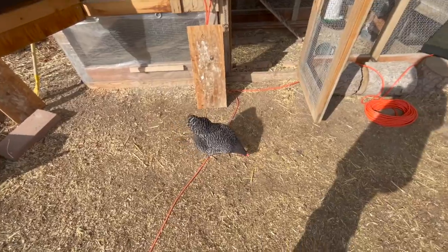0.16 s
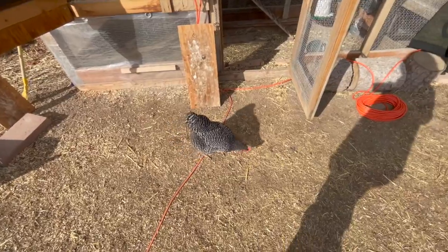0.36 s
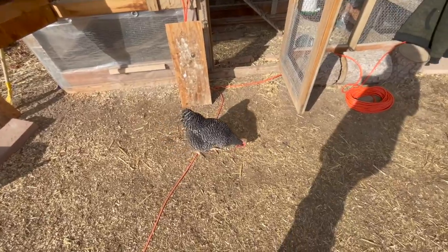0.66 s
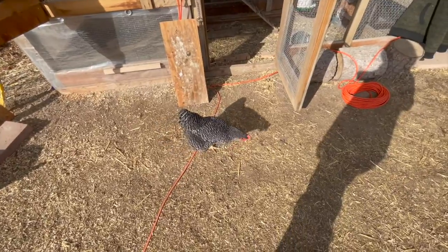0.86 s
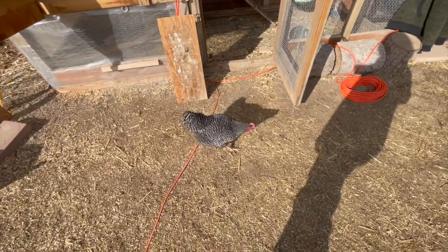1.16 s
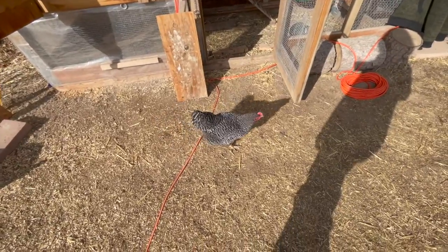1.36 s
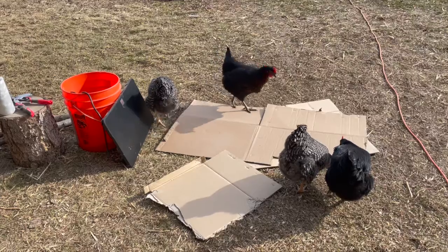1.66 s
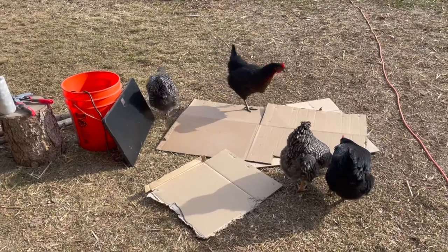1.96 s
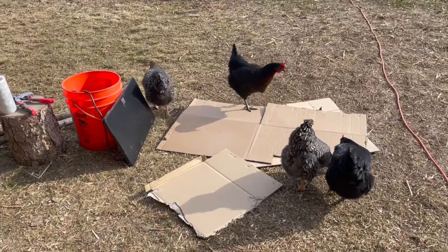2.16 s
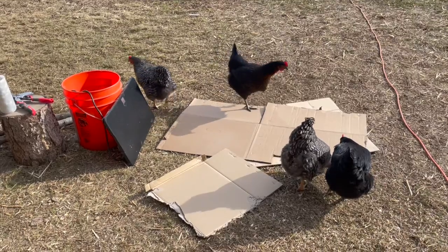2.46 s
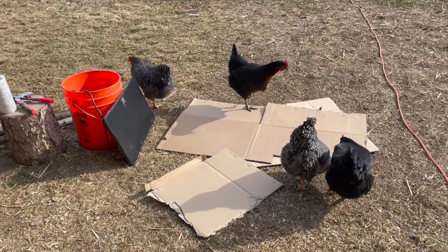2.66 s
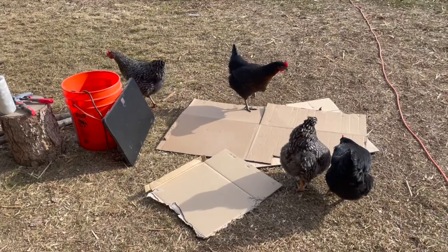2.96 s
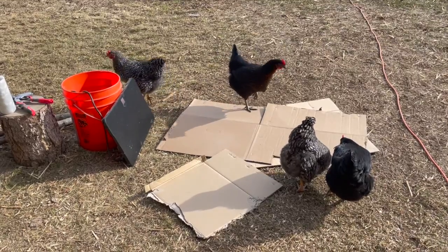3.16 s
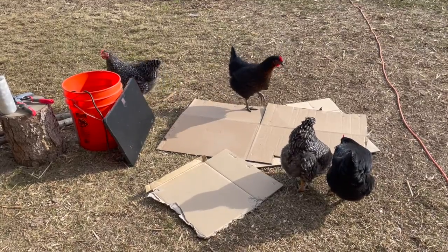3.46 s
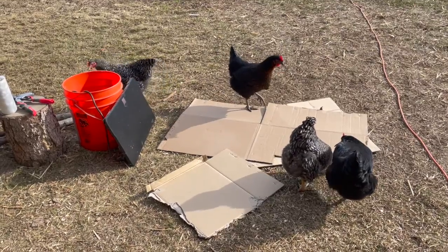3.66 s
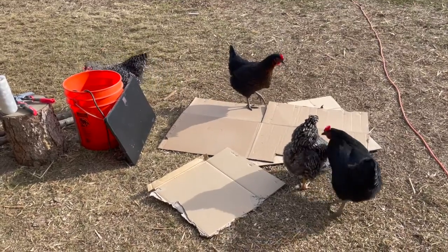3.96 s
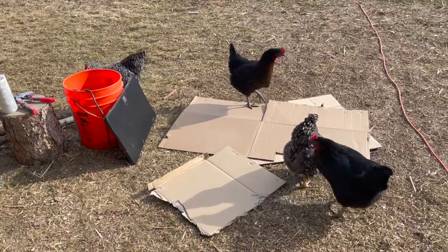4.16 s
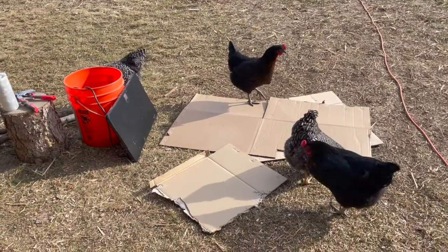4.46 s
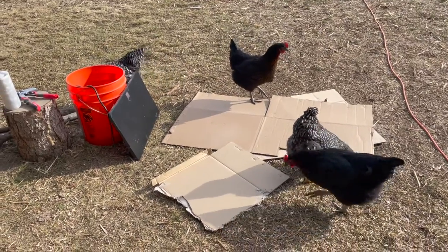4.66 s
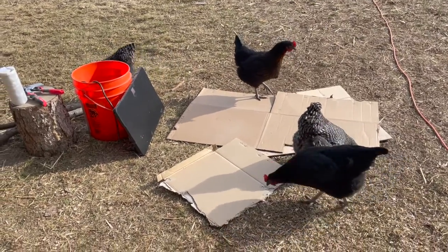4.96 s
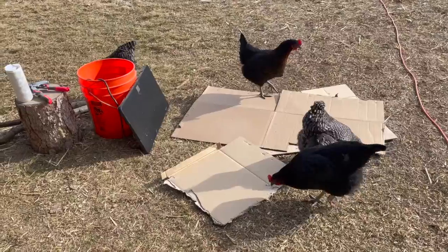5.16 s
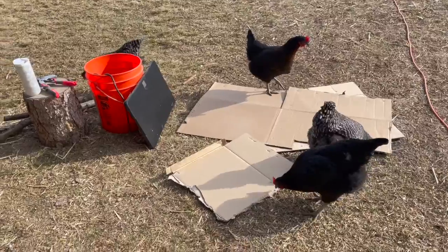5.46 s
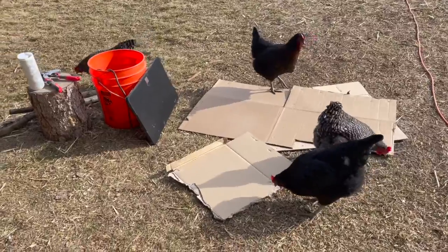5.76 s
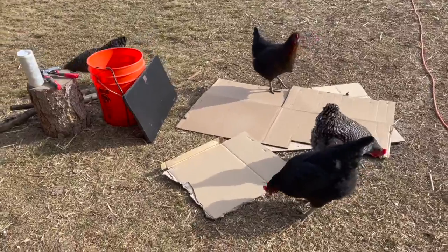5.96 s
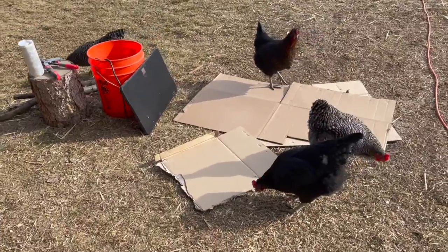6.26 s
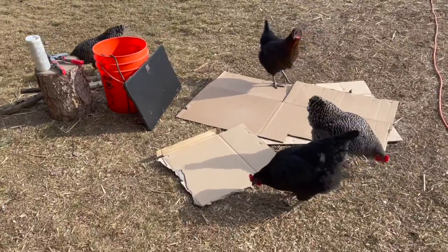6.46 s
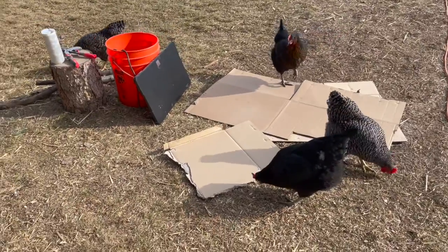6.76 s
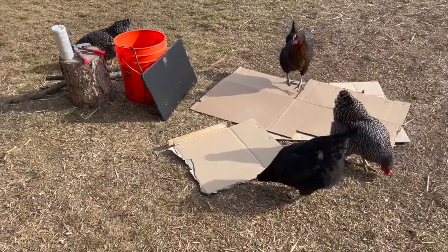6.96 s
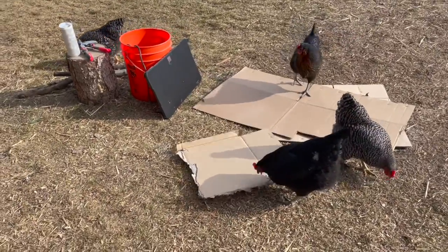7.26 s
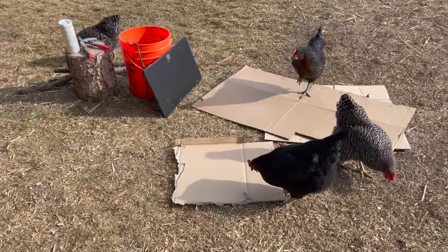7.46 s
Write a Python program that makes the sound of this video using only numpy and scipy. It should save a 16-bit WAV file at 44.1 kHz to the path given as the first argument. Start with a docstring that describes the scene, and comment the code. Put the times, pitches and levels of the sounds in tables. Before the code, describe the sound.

Small songbirds chirp and slur continually, slightly blurred by yard echoes, after an opening of whistles and a swelling raspy buzz. Low buffeting wind and a soft hollow breeze come and go underneath. Close to the microphone, hens tap and crackle over cardboard and dry stalks, first in brief isolated contacts, later in busy scraping, joined by a run of low, short, rounded clucks.

```python
"""A few clear bird whistles open over soft outdoor noise; a rising buzz, chips and a long warble follow.
Hens peck and scrape cardboard over dry grass, then one gives a run of soft clucks near the end.
Birds are gliding or swept sines with yard echoes; clucks are harmonics weighted by a throat resonance.
Pecks and knocks ring resonators; scrapes are dense random snaps; breeze and rumble are banded noise.
Table levels are relative: each source applies its own gain."""
import sys
import numpy as np
from scipy import signal
from scipy.io import wavfile

SR = 44100
rng = np.random.default_rng(int(sys.argv[2]) if len(sys.argv) > 2 else 0)


def to_wav(sig):
    """Store sig (one row per channel, or 1-D mono) as 16-bit WAV at the path in sys.argv[1].

    Samples outside -1..1 are clipped; the rate is SR.
    """
    pcm = np.clip(np.atleast_2d(sig), -1, 1) * 32767
    pcm = np.round(pcm).astype(np.int16)
    wavfile.write(sys.argv[1], SR, pcm.T)  # frames by channels


N = 336042
TIME = np.arange(N) / SR


def from_db(db):
    """Amplitude ratio of a level in dB."""
    return 10 ** (np.asarray(db) / 20)


def rms(x):
    """Root mean square, kept above zero."""
    return np.sqrt(np.mean(x ** 2) + 1e-20)


def in_time(rows):
    """Each column of a table as a curve over the whole scene."""
    s, *columns = np.transpose(rows)
    return [np.interp(TIME, s, column) for column in columns]


def during(rows):
    """True between the first and last row of a table."""
    return (TIME >= rows[0][0]) & (TIME <= rows[-1][0])


def at_hz(points, hz):
    """Reads a spectrum on a log-frequency axis."""
    points_hz, points_db = np.transpose(points)
    return np.interp(np.log(hz), np.log(points_hz), points_db)


def add(out, s, sound):
    """Mixes a short sound in at time s."""
    start = max(round(s * SR), 0)
    out[..., start:start + sound.shape[-1]] += sound[..., :max(N - start, 0)]


def drift(rate_hz):
    """Smooth random curve of rms 1, changing about rate_hz times a second."""
    step = 10  # samples per point of the slow curve
    r = np.exp(-2 * np.pi * step * rate_hz / SR)
    noise = rng.standard_normal(N // step + 4002)
    slow = signal.lfilter([1], [1, -2 * r, r * r], noise)[4000:]  # drop the filter's onset
    return np.interp(np.arange(N) / step, np.arange(len(slow)), slow / rms(slow))


def resonance(x, hz, width_hz):
    """Two-pole resonance with gain 1 on top."""
    r = np.exp(-np.pi * width_hz / SR)
    zeros = np.array([1, 0, -1]) * (1 - r * r) / 2
    poles = [1, -2 * r * np.cos(2 * np.pi * hz / SR), r * r]
    return signal.lfilter(zeros, poles, x)


def bandpass(x, low_hz, high_hz):
    """Butterworth band of x."""
    return signal.sosfilt(signal.butter(2, [low_hz, high_hz], "band", fs=SR, output="sos"), x)


def left_right(mid_side):
    """Scales mid to rms 1 and decodes to left and right."""
    mid, side = mid_side / rms(mid_side[0])
    return np.array([mid + side, mid - side])


def panned(x, pan_db):
    """Tips a stereo sound to the left by pan_db."""
    return np.array([x[0] * from_db(pan_db / 2), x[1] * from_db(-pan_db / 2)])


# side against mid: f/Hz, level/dB
SIDE_WIDTH = [(60, -17), (120, -17), (200, -10), (380, -8.5), (700, -0.5), (1300, 4.5), (2400, -5),
              (4400, -4), (7000, 1.5), (8800, 11), (11800, -2), (13500, -23)]


def coloured(spectrum, count, grain=1, patchy_db=0, shading=None):
    """Stereo noise in flickering bands; grain gates it, shading(hz) adds dB over time; mid rms 1."""
    source = rng.standard_normal((2, 2, N)) * grain
    edges_hz = np.geomspace(spectrum[0][0], min(spectrum[-1][0], SR / 2 - 1000), count + 1)
    out = 0
    for k, (low_hz, high_hz) in enumerate(zip(edges_hz, edges_hz[1:])):
        hz = np.sqrt(low_hz * high_hz)
        band = bandpass(source[k % 2], low_hz, high_hz)  # neighbouring bands use separate noise
        band[1] *= from_db(at_hz(SIDE_WIDTH, hz))
        level_db = at_hz(spectrum, hz) + patchy_db * drift(11.8)
        if shading:
            level_db = level_db + shading(hz)
        out = out + band * from_db(level_db)
    return left_right(out)


def yard(x, t60, first_s=.006, count=90):
    """Scattered echoes off ground, coop and fence, different for each ear; as strong as x."""
    out = np.zeros((2, N))
    for ear in out:
        delays_s = first_s + (np.arange(count) + rng.random(count)) / count * t60 * .7
        gains = from_db(-60 * delays_s / t60) * rng.choice([-1, 1], count)
        for delay_s, gain in zip(delays_s, gains / np.linalg.norm(gains)):
            add(ear, delay_s, gain * x)
    return out


def note_envelope(u, exponent):
    """Rounded envelope over u = 0..1; a small exponent makes it fuller."""
    return np.maximum(np.sin(np.pi * u), 0) ** exponent


def swells(rows, shape):
    """Power-summed pushes (s, dB, rise s, fall s); rise and fall each span 20 dB."""
    power = np.zeros(N)
    for s, level_db, rise_s, fall_s in rows:
        t = np.arange(-min(4 * rise_s, s), 4 * fall_s, 1 / SR)
        away = np.where(t < 0, -t / rise_s, t / fall_s)
        add(power, s + t[0], from_db(level_db - 20 * away ** shape) ** 2)
    return np.sqrt(power)


SWELL_SHAPE = 1.62  # 1: pointed peak, 2: round


# distant outdoor noise: t/s, level/dB
AIR_LEVEL = [(0, -46.5), (.6, -54), (.9, -49.5), (1.45, -43), (1.6, -57.5), (2.6, -56), (3.9, -59.5),
             (5.7, -49), (6.2, -53), (6.6, -47.5), (7.0, -50.5), (7.62, -47.5)]
# its spectrum: f/Hz, density/(dB per Hz)
AIR_SPECTRUM = [(35, -13.5), (70, 10), (150, 8), (300, 3), (600, 2), (950, 1.5), (1300, -7), (2000, -15),
                (2800, -18.5), (4300, -42), (5500, -75), (7000, -96.5)]
# its lean: t/s, left over right/dB
AIR_PAN = [(0, 0.5), (.9, 3.5), (1.45, 1.5), (1.55, 3.5), (7.62, 0.4)]


def distant_air():
    """Distant outdoor noise: banded noise whose level and left-right lean follow tables."""
    noise = coloured(AIR_SPECTRUM, count=16, patchy_db=2.0)
    return from_db(in_time(AIR_LEVEL)[0]) * panned(noise, in_time(AIR_PAN)[0])


# steady wind rumble on the microphone: t/s, level/dB
RUMBLE_LEVEL = [(1.5, -47), (2.4, -40), (3.0, -52.5), (3.45, -49), (4.05, -54.5), (4.45, -42.5),
                (4.8, -48.5), (5.3, -53), (6.3, -51.5), (7.62, -53)]
# eddies buffeting the microphone: peak t/s, level/dB, rise/s, fall/s
EDDIES = [(1.6, -29.5, 0.043, .03), (1.65, -32, 0.063, 0.031), (1.77, -34, 0.082, 0.14),
          (1.94, -41.5, 0.07, 0.16), (2.115, -33.5, 0.049, 0.036), (2.27, -33.5, 0.039, 0.18),
          (2.385, -36.5, 0.022, .05), (2.45, -36.5, 0.041, 0.056), (2.58, -45, .03, 0.028),
          (2.69, -40.5, 0.026, 0.28), (2.89, -35.5, 0.034, .09), (2.975, -34, 0.062, 0.049),
          (3.11, -37, .03, 0.14), (3.215, -41, 0.054, 0.12), (3.36, -45.5, .058, 0.068),
          (3.59, -36, 0.028, 0.043), (3.675, -39.5, .03, 0.097), (3.89, -37, 0.02, 0.037),
          (4.335, -42, 0.038, .03), (4.47, -44, 0.072, 0.081)]
# rumble spectrum: f/Hz, density/(dB per Hz)
RUMBLE_SPECTRUM = [(40, -19.5), (52, -19.5), (70, 4.5), (105, -4), (128, -4), (158, 0), (220, -12.5),
                   (320, -9)]
LUMPS_HZ, LUMPS_DB = 6.8, 3


def wind_rumble(eddy_shape=0.91):
    """Wind pressure on the microphone: lumpy low noise with single eddies, summed in power."""
    steady = from_db(in_time(RUMBLE_LEVEL)[0] + LUMPS_DB * drift(LUMPS_HZ))
    envelope = np.hypot(steady, swells(EDDIES, eddy_shape))
    return envelope * coloured(RUMBLE_SPECTRUM, count=10, patchy_db=1.5) * during(RUMBLE_LEVEL)


# breeze rushing past in two gusts: t/s, level/dB
BREEZE_LEVEL = [(1.5, -56), (1.53, -39), (1.65, -43.5), (2.96, -48.5), (3.4, -59.5), (3.9, -56.5),
                (4.45, -43), (4.8, -42), (5.01, -40), (5.47, -53.5), (5.7, -48.5), (6.15, -56.5),
                (6.8, -69)]
# its spectrum: f/Hz, density/(dB per Hz)
BREEZE_SPECTRUM = [(130, -5), (170, -2.5), (220, -4.5), (300, 0), (390, 1.5), (540, -1), (760, -2.5),
                   (950, -12.5), (1300, -22), (2000, -31)]
# its spectral tilt: t/s, slope/(dB per octave)
BREEZE_TILT = [(1.5, 1.5), (2.2, 5), (2.8, 2), (3.9, 5), (4.3, -2.5), (5.0, -2.5), (5.6, -4.5), (6.5, -0.5)]
# its wandering hollow centre: t/s, f/Hz
BREEZE_CENTRE = [(1.5, 786), (2.2, 687), (3.2, 708), (4.1, 697), (4.5, 564), (4.8, 514), (5.05, 535),
                 (5.3, 450), (5.7, 642)]


def breeze(gain_db=-1, hollow_db=4, hollow_octaves=.3):
    """Soft rush: noise with a moving tilt and a broad wandering peak that sounds hollow."""
    tilt_db, centre_hz = in_time(BREEZE_TILT)[0], in_time(BREEZE_CENTRE)[0]

    def shading(hz):
        """Tilt about 630 Hz plus the hollow peak, in dB over time."""
        octaves_off = np.log2(hz / centre_hz)
        return tilt_db * np.log2(hz / 630) + hollow_db * np.exp(-(octaves_off / hollow_octaves) ** 2)

    noise = coloured(BREEZE_SPECTRUM, count=16, patchy_db=3.0, shading=shading)
    return from_db(gain_db + in_time(BREEZE_LEVEL)[0]) * noise * during(BREEZE_LEVEL)


def whistles(notes):
    """Each note is one quavering, fluttering sine that glides through three pitches."""
    out, waver = np.zeros(N), drift(280)
    for s, length_s, jitter, *pitches_hz, level_db in notes:
        u = np.linspace(0, 1, round(length_s * SR))
        now = round(s * SR) + np.arange(len(u))
        glide_hz = np.polyval(np.polyfit([0, .5, 1], pitches_hz, 2), u)
        pitch_hz = glide_hz * (1 + jitter * waver.take(now, mode="clip"))
        tone = np.sin(2 * np.pi * np.cumsum(pitch_hz) / SR)
        add(out, s, from_db(level_db) * 2 * note_envelope(u, exponent=0.5) * tone)
    flutter_db = 3 * drift(70) - 1
    return out * from_db(flutter_db)


# small birds twittering further off: t/s, level/dB
TWITTER_LEVEL = [(0, -48), (.3, -78), (1.55, -64.5), (2.1, -70.5), (2.65, -63.5), (3.0, -76), (3.8, -80.5),
                 (4.4, -70.5), (5.0, -62), (5.4, -63.5), (5.7, -72), (6.1, -78), (6.6, -60.5), (6.9, -77),
                 (7.62, -82)]


def twitter(gain_db=-1, low_hz=3300, high_hz=4700, jitter=.03, count=700):
    """Distant birds: one short random note per time slot, heard only through echoes."""
    notes = []
    for k, (when, length, height, *bends) in enumerate(rng.random((count, 6))):
        s = (k + when) / count * N / SR
        length_s = .012 + .022 * length
        base_hz = low_hz + (high_hz - low_hz) * height
        pitches_hz = base_hz * (.88 + .24 * np.array(bends))
        notes.append((s, length_s, jitter, *pitches_hz, 0))
    chorus = yard(whistles(notes), t60=.3, count=50)
    return from_db(gain_db + in_time(TWITTER_LEVEL)[0]) * chorus / rms(chorus)


# rising buzz, sweep limits before wobble: t/s, low f/Hz, high f/Hz, level/dB
BUZZ = [(.68, 5130, 5180, -76), (.78, 5040, 5600, -56), (.86, 4990, 6560, -52.5), (1.0, 5100, 6900, -55),
        (1.1, 5060, 7090, -50.5), (1.26, 4870, 7190, -51), (1.32, 4400, 7590, -46.5),
        (1.39, 4260, 7220, -44), (1.50, 4090, 6530, -48.5)]
# pitches that ring out of it: f/Hz, width/Hz, gain/dB
BUZZ_RINGS = [(4180, 260, 4), (4640, 130, 5.5), (4990, 120, 7.5), (5990, 100, 4.5), (6920, 110, -5),
              (8200, 200, 12)]
BUZZ_PAN_DB = 8  # to the left


def buzzer(sweep_hz=185, wobble_hz=240, gain_db=-1.0, direct_db=-9, ring_drift_db=1.5):
    """A whistle swept up and down fast and unevenly, with resonances and close echoes."""
    low_hz, high_hz, level_db = in_time(BUZZ)
    cycles = np.cumsum(sweep_hz * (1 + .3 * drift(150))) / SR
    triangle = np.abs(2 * (cycles % 1) - 1)
    pitch_hz = low_hz + (high_hz - low_hz) * triangle + wobble_hz * drift(49.0)
    tone = np.sin(2 * np.pi * np.cumsum(pitch_hz) / SR)
    rasp_db = 3.2 * drift(45)
    whistle = from_db(level_db + gain_db + rasp_db) * during(BUZZ) * tone
    call = whistle.copy()
    for hz, width_hz, ring_db in BUZZ_RINGS:
        call += from_db(ring_db + ring_drift_db * drift(3.4)) * resonance(whistle, hz, width_hz)
    echoes = yard(call, t60=0.17, first_s=0.0014, count=40)
    return panned((from_db(direct_db) * call + echoes) * during(BUZZ), BUZZ_PAN_DB)


CHIPS_START_S, CHIP_GAP_S, CHIP_S = .881, .105, 0.0245
CHIP_FROM_HZ, CHIP_TO_HZ = 4250, 3800  # before jitter
FIRST_CHIP_DB, CHIP_GROWTH_DB = -53.5, 2


def chips(count=4):
    """An even run of short falling notes, each a little louder."""
    middle_hz = (CHIP_FROM_HZ + CHIP_TO_HZ) / 2
    notes = []
    for k in range(count):
        s, level_db = CHIPS_START_S + k * CHIP_GAP_S, FIRST_CHIP_DB + k * CHIP_GROWTH_DB
        notes.append((s, CHIP_S, CHIP_FROM_HZ, middle_hz, CHIP_TO_HZ, level_db))
    return notes


# songbird notes: t/s, length/s, start f/Hz, middle f/Hz, end f/Hz, level/dB
SONG = [(0, 0.037, 3920, 4000, 4500, -56.5), (0.062, 0.03, 3190, 3700, 4250, -48),
        (0.105, 0.035, 2740, 2900, 2970, -46), (0.12, 0.034, 2740, 2400, 2210, -53.5),
        (0.244, 0.056, 4870, 5230, 5070, -60.5), (1.946, .06, 6830, 6340, 5800, -75),
        (1.957, 0.089, 3380, 3320, 3360, -68), (2.06, 0.062, 6700, 6250, 5430, -71.5),
        (2.162, 0.072, 6620, 6450, 6000, -85), (1.978, 0.04, 5400, 5200, 4640, -67),
        (2.041, 0.094, 5390, 5310, 5170, -58.5), (2.094, 0.048, 5570, 4890, 3980, -56),
        (2.103, 0.058, 4010, 3960, 3870, -63), (2.154, 0.042, 5100, 5060, 5230, -67.5),
        (2.221, 0.044, 5300, 4700, 3620, -64), (2.37, 0.037, 4110, 4300, 4340, -64),
        (2.411, 0.033, 4850, 4840, 4800, -59), (2.421, 0.1, 4430, 3990, 3880, -65),
        (2.566, 0.032, 6100, 5780, 5600, -74), (2.572, .055, 3960, 3900, 3770, -58.5),
        (2.644, 0.069, 4600, 4800, 4900, -71), (2.647, 0.092, 3360, 3236, 3270, -61.5),
        (2.734, 0.03, 4010, 3850, 3800, -61), (2.766, 0.031, 3330, 3330, 3260, -62),
        (2.856, 0.03, 4300, 3770, 3900, -60), (2.905, 0.034, 5500, 5800, 5530, -66),
        (2.972, 0.034, 5000, 4970, 4830, -66.5), (3.151, 0.057, 5350, 4820, 5630, -69.5),
        (3.236, 0.062, 5150, 5200, 5200, -61), (3.29, 0.048, 5340, 4320, 3680, -61.5),
        (3.428, 0.038, 4920, 4220, 3520, -66), (3.912, 0.021, 4070, 4060, 3670, -68),
        (4.043, 0.029, 4050, 4380, 4380, -59), (4.06, 0.023, 3690, 3610, 3800, -58),
        (4.079, 0.032, 4850, 5140, 5150, -63.5), (4.212, 0.056, 5250, 4850, 3910, -55.5),
        (4.25, 0.045, 3770, 3800, 3720, -51), (4.326, 0.029, 4280, 4750, 5140, -61),
        (4.353, 0.014, 5260, 4590, 4130, -57.5), (4.443, 0.096, 4200, 3960, 4110, -56),
        (4.492, 0.059, 4060, 4396, 4405, -51), (4.507, 0.026, 4460, 4800, 4800, -62),
        (4.629, 0.033, 4100, 3620, 3200, -54), (4.717, 0.076, 3950, 3950, 3800, -53),
        (4.792, 0.043, 5030, 5120, 4980, -62), (4.813, 0.044, 3050, 2992, 2930, -47),
        (4.923, 0.06, 5320, 4690, 3400, -56), (5.037, 0.065, 3740, 3450, 2600, -55),
        (5.163, 0.065, 4470, 4020, 3540, -56.5), (5.19, 0.051, 3600, 3530, 3680, -53.5),
        (5.303, 0.074, 4700, 4490, 4260, -52), (5.386, 0.045, 3960, 3700, 4400, -58),
        (5.445, 0.028, 4700, 4200, 3860, -61), (5.483, 0.017, 3230, 3230, 3250, -49.5),
        (5.514, 0.13, 3230, 3290, 3530, -54.5), (5.707, .05, 5160, 4860, 4000, -61),
        (5.786, 0.05, 3760, 3315, 3140, -58), (5.802, 0.019, 3650, 3470, 3200, -60),
        (5.922, 0.068, 3440, 3520, 2810, -63), (6.017, .018, 4220, 4670, 4440, -56),
        (6.034, 0.011, 3920, 3740, 4230, -53), (6.177, 0.037, 3090, 3340, 3730, -65.5),
        (6.324, 0.039, 4760, 4970, 4940, -65), (6.393, 0.055, 4930, 4520, 3520, -55),
        (6.442, 0.017, 3750, 3680, 3740, -54), (6.477, 0.059, 5180, 4800, 3550, -51),
        (6.595, 0.026, 3300, 3300, 3300, -60), (6.718, 0.055, 3970, 3740, 2980, -64.5),
        (6.819, 0.025, 4460, 4560, 3420, -56.5), (7.281, 0.057, 4970, 4580, 3410, -48.5),
        (7.563, 0.013, 4100, 4490, 5000, -52), (7.576, 0.021, 4830, 3870, 4700, -53.5),
        (7.588, .016, 4660, 4380, 3860, -60)]


def warbler(direct_db=-5.5, near_echo_db=-2.5, far_echo_db=-11, steady_jitter=0.012, jitter_per_octave=0.042):
    """Gliding whistles that quaver more the wider they slur, blurred by close and longer echoes."""
    notes = []
    for s, length_s, start_hz, middle_hz, end_hz, level_db in SONG + chips():
        jitter = steady_jitter + jitter_per_octave * abs(np.log2(end_hz / start_hz))
        notes.append((s, length_s, jitter, start_hz, middle_hz, end_hz, level_db))
    song = whistles(notes)
    blur = yard(song, t60=0.17, first_s=0.0022, count=60)
    tail = yard(song, t60=0.35, count=70)
    return from_db(direct_db) * song + from_db(near_echo_db) * blur + from_db(far_echo_db) * tail


def grains(per_s, spread_db):
    """Random catches of fibres: many small, a few large."""
    sizes_db = spread_db * np.minimum(rng.exponential(1, N), 4)
    return (rng.random(N) < per_s / SR) * from_db(sizes_db)


# cardboard giving under a foot: peak t/s, level/dB, rise/s, fall/s
FLEXES = [(6.545, -53.5, 0.046, 0.058), (6.574, -47, 0.017, 0.022), (7.18, -47.5, 0.059, 0.081),
          (7.385, -51, 0.045, 0.064)]
# its crunch: f/Hz, density/(dB per Hz)
CRUNCH_SPECTRUM = [(900, 1), (1200, 4), (1600, -1.5), (2200, -2), (2800, -5.5), (3600, 0)]


def flexing():
    """Fibres of the corrugated sheet give way in a quick cluster of hollow cracks."""
    cracks = grains(1500, spread_db=3)
    return swells(FLEXES, SWELL_SHAPE) * coloured(CRUNCH_SPECTRUM, count=8, grain=cracks, patchy_db=2.5)


def taps(rows, contact_s, tick_db, echo_db):
    """Each tap is a brief crunch that sets the struck spot ringing, with a thin tick on top."""
    out, t = np.zeros((2, N)), TIME[:SR // 20]
    crunches = rng.standard_normal((len(rows), 2, len(t)))
    for (s, peak_db, hz, q), crunch in zip(rows, crunches):
        contact = crunch * np.exp(-t / contact_s)
        body = resonance(resonance(contact, hz, hz / q), hz, hz)
        tick = resonance(contact, 9400, 3000)
        mid, side = body + from_db(tick_db) * tick
        side = side * from_db(at_hz(SIDE_WIDTH, hz)) * rms(mid) / rms(side)
        add(out, s, from_db(peak_db) * np.array([mid + side, mid - side]) / np.abs(mid).max())
    return out + from_db(echo_db) * yard(out.mean(axis=0), t60=0.074)


# dull knocks and crunches around the cardboard: t/s, mid peak/dB, ring f/Hz, Q
KNOCKS = [(1.519, -35, 714, 2.5), (1.529, -36.5, 780, 7.3), (1.562, -45, 743, 3.3),
          (4.132, -38.5, 490, 2.5), (5.736, -38.5, 740, 2), (6.569, -39, 1550, 3.3),
          (6.574, -49, 2700, 1.2), (6.581, -48, 1870, 2.5), (7.378, -26, 534, 3.7), (7.392, -42, 2260, 12)]


def knocks():
    """Slow contacts on cardboard ring low, with almost no tick."""
    return taps(KNOCKS, contact_s=.005, tick_db=-65, echo_db=-8)


# pecks and snapping stalks: t/s, mid peak/dB, ring f/Hz, Q
PECKS = [(.591, -54, 8650, 17), (.609, -49.5, 8860, 20), (.653, -60, 8300, 13), (1.157, -37, 13000, 17),
         (1.518, -41, 3870, 8), (1.528, -31.5, 3460, 7), (1.5325, -28, 4600, 2.8), (1.617, -55, 11400, 16),
         (1.828, -39.5, 4100, 18), (1.835, -33, 4130, 10), (1.843, -53, 5440, 1.8), (1.853, -55, 6440, 1.7),
         (4.062, -55.5, 12800, 17), (5.55, -38, 12000, 3), (5.564, -37, 7500, 2), (5.605, -28, 5800, 2.2),
         (5.613, -19.5, 11500, 3.3), (5.621, -25, 4900, 3.4), (5.629, -30.5, 5900, 1.5),
         (5.717, -40, 7150, 11), (6.377, -34, 6850, 9.6), (6.466, -43, 6600, 9.9), (6.479, -51, 6800, 9),
         (6.501, -43, 13400, 4.7), (7.060, -33.5, 4400, 10), (7.108, -33, 4430, 7.1),
         (7.162, -39, 6200, 2.7), (7.189, -29, 3900, 3), (7.216, -44, 7000, 3), (7.229, -36, 3300, 5),
         (7.269, -33, 12100, 4.5), (7.272, -36, 4300, 5), (7.371, -31.5, 7500, 3.6),
         (7.398, -31, 4900, 3.3), (7.415, -32, 6700, 5)]


def pecks():
    """Quick beak contacts and stalk snaps ring high, with an audible tick."""
    return taps(PECKS, contact_s=0.0011, tick_db=-14.5, echo_db=-6.5)


def stalks(spectrum, per_s, spread_db, clump_db, count=22):
    """Dry stalks snap in uneven clumps, each snap ringing briefly in its own band; mid rms 1."""
    edges_hz = np.linspace(spectrum[0][0], min(spectrum[-1][0], SR / 2 - 1000), count + 1)
    chance = per_s / count / SR * from_db(clump_db * drift(60))
    out = 0
    for low_hz, high_hz in zip(edges_hz, edges_hz[1:]):
        hz, snaps = (low_hz + high_hz) / 2, np.zeros((2, N))
        born = np.flatnonzero(rng.random(N) < chance)
        sizes = from_db(spread_db * np.minimum(rng.exponential(1, 4096), 3))
        sizes = sizes * rng.choice([-1, 1], (2, 4096))  # separate signs for mid and side
        width = from_db([[0], [at_hz(SIDE_WIDTH, hz)]])
        snaps[:, born] = sizes.take(born, axis=1, mode="wrap") * width
        out = out + from_db(at_hz(spectrum, hz)) * bandpass(snaps + 1e-18, low_hz, high_hz)
    return left_right(out)


# hens treading in grass: peak t/s, level/dB
STEPS = [(.01, -64), (1.158, -56), (4.02, -84), (4.55, -82), (4.8, -69.5), (5.17, -73), (5.5, -74),
         (5.82, -68), (6.22, -68.5), (6.28, -54.5), (6.38, -72), (6.585, -50.5), (6.9, -71)]
# grass stirring faintly between steps: t/s, level/dB
STIRRING = [(0, -99), (1.4, -89), (2.0, -104), (3.9, -106), (4.6, -85), (7.62, -87.5)]
# dry grass under a foot: f/Hz, density/(dB per Hz)
TREAD_SPECTRUM = [(2500, -13.5), (4000, -2), (7000, 0), (8400, -7.5), (9700, -15), (11300, -3), (12800, 11),
                  (13600, 5.5), (15000, -20)]
STEP_RISE_S, STEP_FALL_S = 0.032, 0.039  # each spans 20 dB


def treading(gain_db=-3):
    """Footsteps and faint stirring set off snaps in dry grass."""
    crackle = stalks(TREAD_SPECTRUM, per_s=20000, spread_db=3.8, clump_db=3.5, count=18)
    steps = swells([(s, level_db, STEP_RISE_S, STEP_FALL_S) for s, level_db in STEPS], SWELL_SHAPE)
    return from_db(gain_db) * (steps + from_db(in_time(STIRRING)[0])) * crackle


# claws and cardboard over dry grass: peak t/s, level/dB, rise/s, fall/s
STROKES = [(1.54, -46.5, 0.0085, 0.035), (1.66, -72, .17, 0.16), (1.842, -45.5, 0.025, 0.03),
           (5.578, -42, 0.044, .035), (5.618, -30, 0.028, 0.025), (5.65, -50.5, .02, .06),
           (5.742, -49, 0.067, .045), (6.277, -64, 0.048, 0.077), (6.508, -47.5, .016, 0.088),
           (6.57, -51, 0.065, 0.056), (7.063, -45, 0.013, 0.088), (7.118, -35.5, 0.027, 0.058),
           (7.165, -33.5, 0.045, 0.035), (7.194, -30.5, 0.062, 0.068), (7.272, -41.5, 0.029, .016),
           (7.392, -33.5, 0.093, .08), (7.455, -47.5, .04, 0.035)]
# their scrape: f/Hz, density/(dB per Hz)
SCRAPE_SPECTRUM = [(1200, -12), (1700, -21), (2400, -15.5), (3100, -4), (4100, 5), (5500, 0.5), (7800, 2),
                   (9500, -7.5), (11000, 2.5), (12800, 7), (14200, -1.5), (15500, -20)]


def scraping(gain_db=-5.0):
    """Cardboard and claws catch and slip over dry stalks in a dense crackle."""
    drag = stalks(SCRAPE_SPECTRUM, per_s=24000, spread_db=3.6, clump_db=3.8)
    return from_db(gain_db) * swells(STROKES, SWELL_SHAPE) * drag


# clucks, pitch before catch and waver: t/s, length/s, start f/Hz, end f/Hz, level/dB, left over right/dB
CLUCKS = [(6.864, .05, 504, 493, -49, 15), (6.989, 0.029, 504, 513, -33.5, 20),
          (7.146, 0.058, 498, 499, -35, 8), (7.32, 0.044, 496, 471, -34, 5.5),
          (7.352, 0.029, 511, 482, -32, 11), (7.509, 0.035, 491, 453, -27, 7.5),
          (7.54, 0.032, 495, 463, -34.5, 6)]
# throat with the beak nearly shut: f/Hz, level/dB
THROAT = [(480, -19.5), (970, 3), (1450, -29.5), (1850, -27.5), (2000, -31), (2500, -61), (3400, -60),
          (3900, -38), (4400, -49.5), (4900, -48), (5600, -60)]


def hen(gain_db=2.0, echo_db=-15, effort=0.2, catch=0.082, catch_s=0.0048, rasp=0.047):
    """Short clucks whose second harmonic sits on the throat resonance, so each is nearly a pure hoot."""
    out = np.zeros((2, N))
    waver, flutter_db, grit = .008 * drift(160), 1.1 * drift(220), drift(450)
    loudest_db = max(row[4] for row in CLUCKS)
    for s, length_s, start_hz, end_hz, level_db, pan_db in CLUCKS:
        u = np.linspace(0, 1, round(length_s * SR))
        now = round(s * SR) + np.arange(len(u))
        pitch_hz = (start_hz + (end_hz - start_hz) * u) * (1 + waver.take(now, mode="clip"))
        pitch_hz *= 1 + catch * np.exp(-u * length_s / catch_s)  # starts high and drops at once
        phase = 2 * np.pi * np.cumsum(pitch_hz) / SR
        # upper overtones: strongest at the start and in loud clucks
        push = from_db(effort * (level_db - loudest_db)) * 2 * (1 - u)
        voice = np.zeros(len(u))
        for k in range(1, 12):
            harmonic = from_db(at_hz(THROAT, k * pitch_hz)) * np.sin(k * phase)
            voice += harmonic * (push if k > 3 else 1)
        voice *= 1 + rasp * grit.take(now, mode="clip")
        voice *= note_envelope(u ** .8, exponent=1.1)
        voice *= from_db(level_db + gain_db + flutter_db.take(now, mode="clip"))
        ears = from_db([[pan_db / 2], [-pan_db / 2]])
        add(out, s, voice * ears / ears.mean())
    return out + from_db(echo_db) * yard(out.mean(axis=0), t60=0.18)


def scene():
    """Outdoor noise and birds behind, hens close by."""
    background = distant_air() + wind_rumble() + breeze()
    birds = twitter() + buzzer() + warbler()
    ground = flexing() + knocks() + pecks() + treading() + scraping()
    return background + birds + ground + hen()


# brief dip of the whole sound, end values held outside it: t/s, gain/dB
DIP = [(1.484, -3), (1.492, -43), (1.508, -27), (1.519, 1.5)]
BASS_CUT_HZ, TOP_CUT_HZ = 42, 15200


def record(dry):
    """Level dips once, briefly; the deepest bass and the top are cut."""
    dipped = dry * from_db(in_time(DIP)[0])
    lean = signal.sosfilt(signal.butter(4, BASS_CUT_HZ, "high", fs=SR, output="sos"), dipped)
    return signal.sosfilt(signal.ellip(10, .2, 80, TOP_CUT_HZ, fs=SR, output="sos"), lean)


dry = scene()
out = record(dry)
to_wav(out)
```